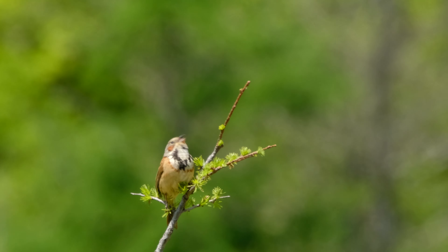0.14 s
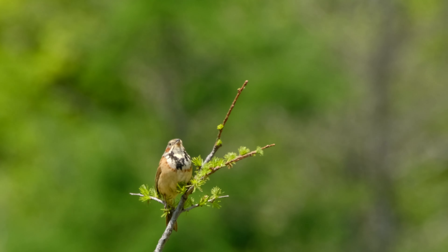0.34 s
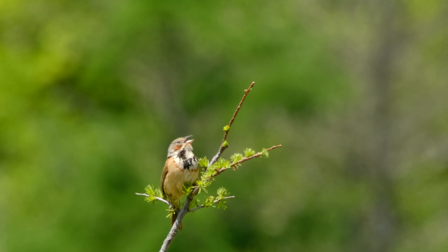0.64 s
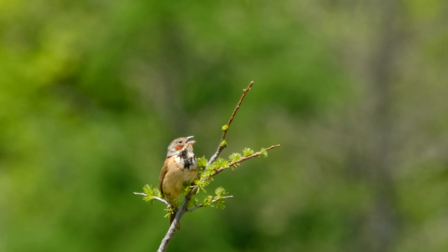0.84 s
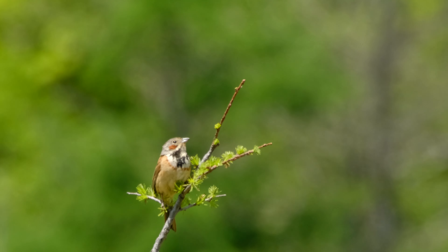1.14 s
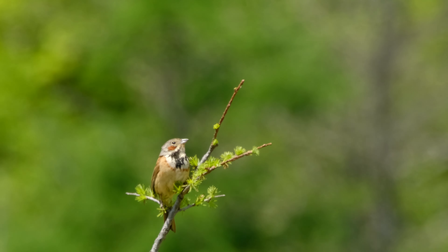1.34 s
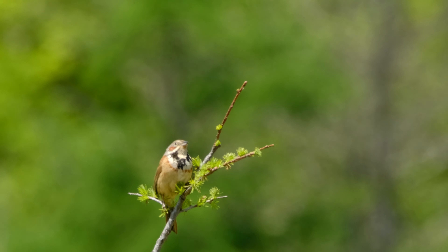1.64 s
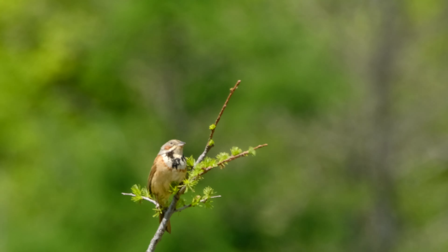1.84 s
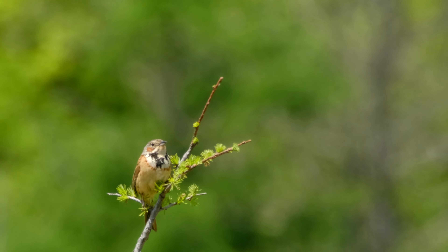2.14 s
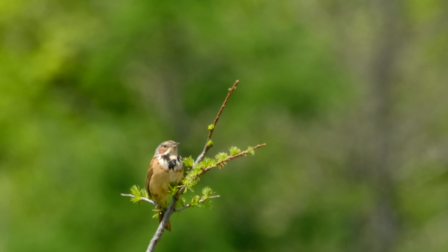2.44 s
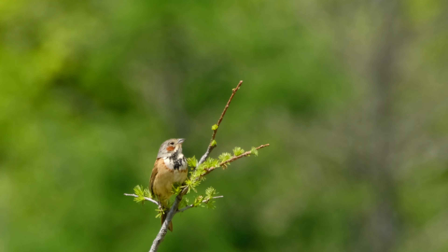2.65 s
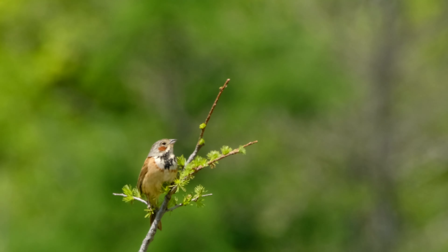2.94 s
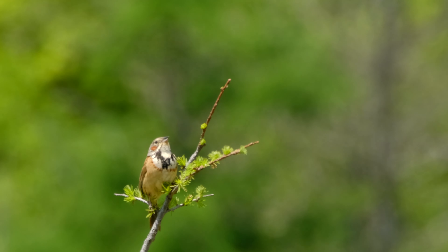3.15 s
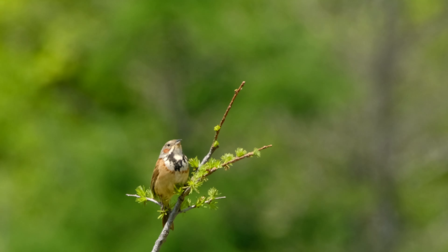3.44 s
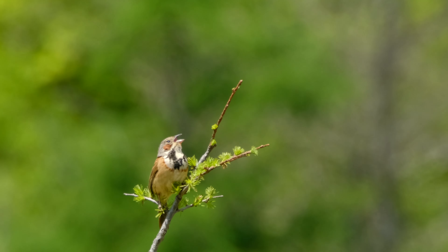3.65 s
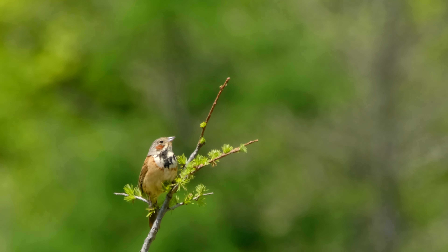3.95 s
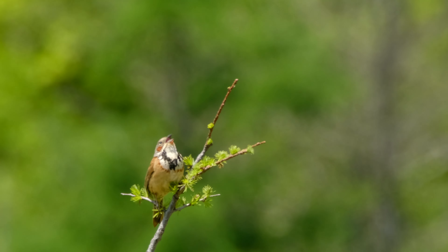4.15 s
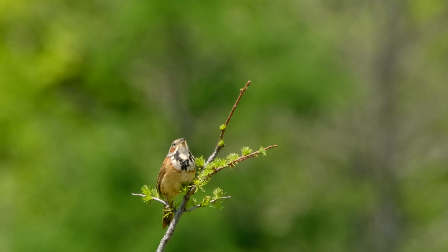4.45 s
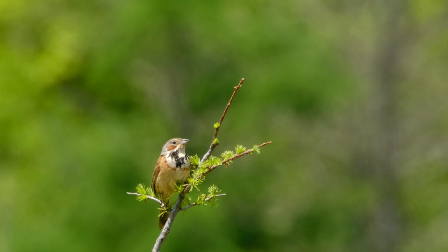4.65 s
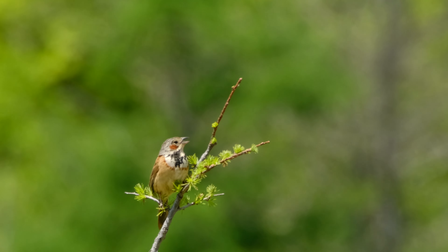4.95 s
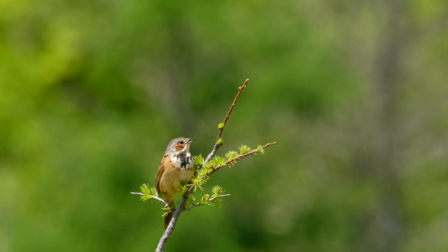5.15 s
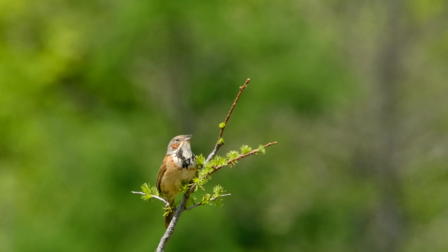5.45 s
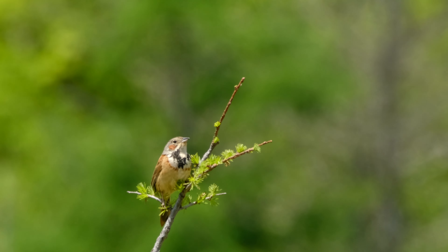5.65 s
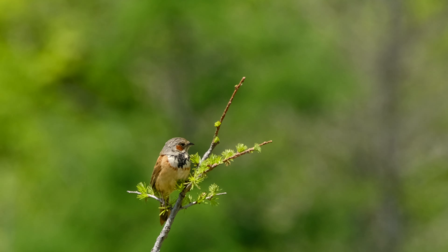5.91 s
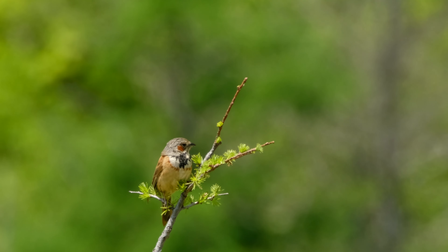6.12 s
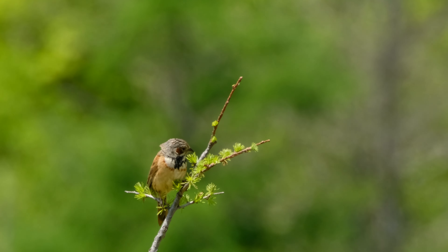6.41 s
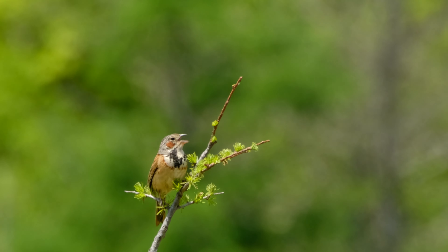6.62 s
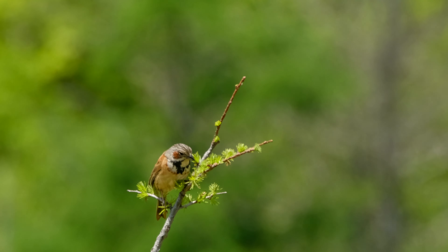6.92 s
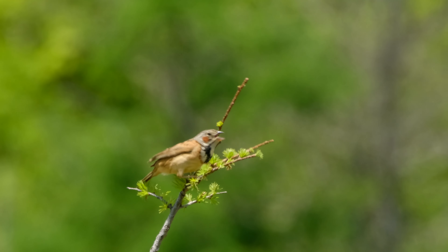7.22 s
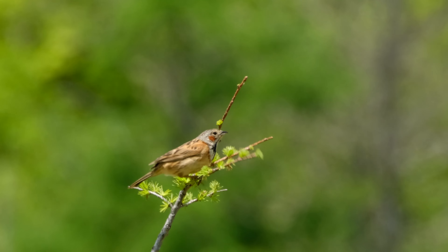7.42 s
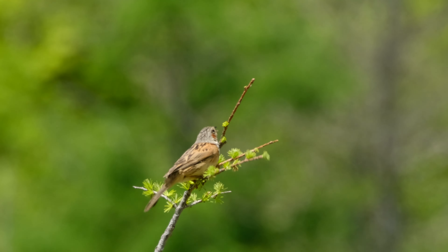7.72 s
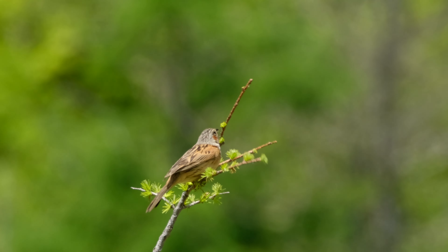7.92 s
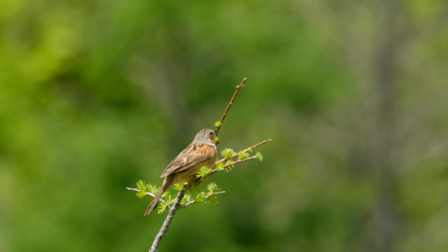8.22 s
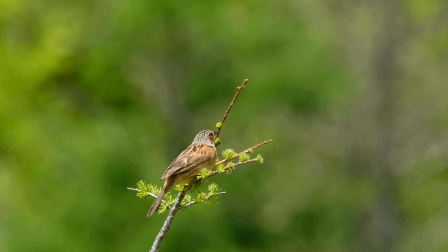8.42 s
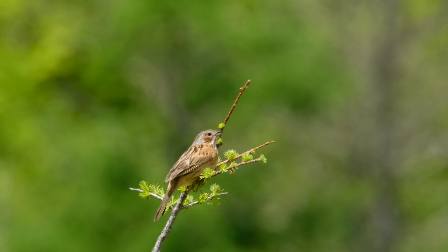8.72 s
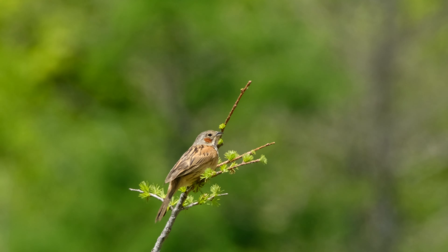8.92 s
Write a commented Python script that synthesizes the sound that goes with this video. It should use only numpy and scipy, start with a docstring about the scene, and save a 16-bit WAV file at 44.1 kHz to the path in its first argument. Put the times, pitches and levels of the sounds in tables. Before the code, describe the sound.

A small bird sings short, sharp, high twittering phrases over a steady insect buzz, with low wind rumble and faint distant bird whistles outdoors.

```python
"""In open country a bunting sings short, sharp phrases from a larch twig, with both sides of its syrinx as
gliding tones. A far chorus of cicadas buzzes steadily as resonant noise; other birds whistle faintly in the
distance, and soft slurs lead into the flourishes, all as gliding tones. Gusts rumble on the microphone as
shaped noise, over a soft wash of leaves and each channel's own hiss. The birds and the cicadas arrive almost
wholly in the right channel; the rumble is nearly alike in both."""
import sys
import numpy as np
from scipy import signal
from scipy.fft import rfft, irfft
from scipy.io import wavfile
from scipy.ndimage import uniform_filter1d

SR = 44100
rng = np.random.default_rng(int(sys.argv[2]) if len(sys.argv) > 2 else 0)


def master(y):
    """Save y as 16-bit WAV."""
    cut = np.clip(np.atleast_2d(y).T, -1, 1)
    pcm = np.round(cut * 32767)  # scale
    wavfile.write(sys.argv[1], SR, pcm.astype(np.int16))


N = 399987  # length in samples

# Noise spectra of leaves, channel hiss, wind rumble and small eddies, each later scaled to rms 1.
# Each row: frequency in Hz, relative spectral level in dB per Hz.
LEAF_SPECTRUM = [(100, -8), (400, 1.5), (650, 0.5), (800, 2), (950, -1.5), (3000, 3), (5000, -28),
                 (5800, -11.5), (7000, -38), (12000, -24)]
HISS_SPECTRUM = [(100, -47), (1000, 8), (4000, 1.5), (8000, 3.5), (16000, 2.5)]
RUMBLE_SPECTRUM = [(15, -13), (30, -8.5), (52, -2), (85, 0), (112, 0.5), (140, -7), (200, -17.5),
                   (300, -26), (600, -66), (3000, -100)]
EDDY_SPECTRUM = [(40, -28), (100, -1), (150, 2), (220, -3.5), (320, -13.5), (480, -21.5), (800, -54),
                 (4000, -100)]

# The steady breeze on the microphone, before a common lift. Each row: time in s, wind level in dB.
BREEZE_LEVELS = [(0.0, -40), (1.46, -55.5), (1.82, -48), (4.14, -47.5), (4.29, -40), (5.46, -41.5),
                 (6.14, -46), (6.49, -41), (7.27, -43.5), (8.03, -38), (8.71, -41.5), (9.07, -40)]

# Gusts on top of the breeze. Each row: time of the crest in s, wind level in dB,
# half length in s (to 1/e of the crest's power).
GUST_CRESTS = [(1.81, -48.5, 0.1), (2.031, -37, 0.012), (2.698, -42.5, 0.11), (3.566, -42.5, 0.076),
               (4.164, -37, 0.068), (4.518, -33, 0.045), (4.987, -35, 0.11), (5.381, -33, 0.021),
               (5.583, -34.5, 0.1), (5.994, -37, .035), (6.43, -37.5, 0.072), (7.98, -34, 0.13)]

# Resonances of the cicadas' bodies. Each row: frequency in Hz, width of each of two stages in Hz,
# rms level in dB before swell and throb, direct sound left minus right in dB.
CICADA_RESONANCES = [(1434, 390, -44, -19.5), (1713, 350, -50.5, -32), (2162, 214, -40, -25.5),
                     (2560, 300, -51.5, -28), (2851.5, 259, -32.5, -30), (3116, 226, -42.5, -31),
                     (4126, 630, -54.5, -26)]

# The lower-voiced group of cicadas. Each row: time in s, level in dB of its ringing of rms 1.
LOW_GROUP_LEVELS = [(0, -45), (1.3, -44.5), (2.2, -44), (3.5, -44.5), (5.0, -46), (6.2, -46.5), (6.85, -37),
                    (7.5, -48.5), (9.07, -45)]

# Faint whistles: other birds in the distance, and soft slurs just before the flourishes near 3.2 and 6.75 s.
# Each row: start in s, length in s, first pitch in Hz, last pitch in Hz, level in dB before the losses of the
# throat.
FAINT_WHISTLES = [ (1.15, 0.076, 3950, 3960, -50), (1.426, 0.16, 5050, 5080, -51),
                  (3.172, 0.048, 5750, 4600, -51), (5.87, 0.045, 5700, 6300, -54),
                  (5.96, 0.02, 3750, 3400, -42), (6.02, .14, 8350, 8600, -42),
                  (6.207, .06, 6400, 4020, -40.5), (6.245, .095, 4200, 3820, -46.5),
                  (6.6, .06, 6500, 5200, -53), (6.715, 0.04, 6500, 4800, -46),
                  (7.473, 0.13, 5770, 5250, -48.5), ]

# Turns of pitch of the bunting's notes, by gesture, before the syllable's pitch ratio.
# Each row: time from the note's start in ms, pitch in Hz.
PITCH_GESTURES = { "buzz_high": [(0, 4580), (18, 4280), (33, 3830)], "buzz_low": [(0, 4180), (22, 3800),
                  (37, 3350)], "hiccup": [(0, 3550), (5, 3300), (17, 3220)], "squiggle": [(0, 5000),
                  (4, 6300), (9, 5400), (15, 6500), (20, 6000)], "zigzag": [(0, 6700), (2, 6150), (5, 3950),
                  (10, 6100), (13, 3850), (20, 5500), (24, 3100)], "arch": [(0, 4400), (7, 4950),
                  (13, 5800), (18, 6050), (35, 5850), (39, 5400)], "slur": [(0, 3250), (15, 3450),
                  (26, 4380), (34, 4520), (44, 4480)], "cap": [(0, 5300), (5, 6600), (9, 6950), (15, 6650)],
                  "peak": [(0, 5200), (5, 4500), (11, 4400), (19, 5900), (22, 5700), (30, 3000)],
                  "hook": [(0, 3100), (7, 4650), (9, 4600), (15, 3200)], "trough": [(0, 7400), (6, 5950),
                  (10, 5600), (17, 5850), (24, 7050)], "slide": [(0, 7100), (9, 5550), (23, 4600)],
                  "blip": [(0, 3250), (7, 3650), (14, 3300)], "chip": [(0, 5400), (2, 4750), (8, 4100),
                  (12.5, 2900)], "dip": [(0, 5600), (4, 4700), (10, 4150), (14, 5300)],
                  "rattle": [(0, 3800), (8, 3250), (24, 3150)], "lift": [(0, 3100), (6.5, 4650),
                  (10, 3400)], "shelf": [(0, 4150), (4, 5000), (19, 4850), (22, 5700), (24.5, 7600),
                  (27, 5600), (29.5, 3600), (34, 6200)], "flick": [(0, 4300), (5, 6150), (7, 6800),
                  (9, 5700), (13, 2900)], }

# Gestures whose pitch shakes. Each row: rate in Hz, depth as a share of the pitch.
PITCH_FLUTTER = {"rattle": (235, .11), "hiccup": (170, .1)}

# Each syllable is a fixed group of notes; where two overlap, both sides of the syrinx sound.
# Each row: onset in ms, gesture, level in dB within the syllable, attack in ms, release in ms.
SYLLABLE_NOTES = { "warble": [(0, "buzz_high", -8, 22, 14), (0, "buzz_low", -7, 13, 10),
                  (49, "hiccup", -4, 5.3, 12), (54.4, "squiggle", -32, 3, 5.6), (75, "zigzag", -2, 3.5, 5)],
                  "duet": [(0, "arch", -6.5, 7.8, 3.1), (14, "slur", 0, 35.6, 13)],
                  "ripple": [(0, "cap", -11, 3.3, 3.7), (0, "peak", 4, 32, 14), (42, "hook", -10.5, 3.6, 6),
                  (52, "trough", -1.5, 5.4, 3), (67.6, "blip", -11.5, 3, 4.4),
                  (71, "slide", -6.5, 2.2, 10.6)], "tick": [(0, "chip", -1, 3, 2), (12, "dip", -14, 2.7, 3),
                  (26, "rattle", -3.5, 1.6, 20)], "flourish": [(0, "lift", -3.5, 2.9, 4.3),
                  (9.05, "shelf", -2, 2.5, 1.1), (44.5, "flick", -5.5, 1.3, 2.1)], }

# The bird goes round its five syllables in the same order.
# Each row: start in s, syllable, level in dB before the losses of the throat, pitch ratio.
SONG_SYLLABLES = [ (0.269, "warble", -16, 0.98), (0.738, "duet", -20.5, 1.004),
                  (0.906, "ripple", -25, 1.01), (2.662, "tick", -30, 1.03), (3.206, "flourish", -19, 1.007),
                  (3.710, "warble", -18, 1.0), (4.241, "duet", -21, 1.02), (4.388, "ripple", -18, 0.98),
                  (5.54, "tick", -19.5, .99), (6.753, "flourish", -19.5, 1.035),
                  (7.276, "warble", -21.5, 0.99), (7.802, "duet", -29, 1.05), (7.939, "ripple", -25.5, .99),
                  ]

WHISTLE_ATTACK_SHARE, WHISTLE_RELEASE_SHARE = 0.26, 0.35  # of a whistle's length
CUTOFF_HZ = 15850


def from_db(db):
    """An amplitude ratio is ten to the power of its decibels over twenty."""
    return 10 ** (np.asarray(db) / 20)


def rms_one(x):
    """Dividing a signal by its root mean square gives it unit rms."""
    return x / np.sqrt(np.mean(x ** 2) + 1e-20)


def noise(spectrum):
    """Weighting the spectrum of white noise gives steady coloured noise, here of rms 1."""
    hz, db = np.transpose(spectrum)
    bins = np.maximum(np.fft.rfftfreq(N, 1 / SR), 1)
    # levels run straight between the points on a logarithmic frequency axis
    gain = from_db(np.interp(np.log(bins), np.log(hz), db))
    white = rfft(rng.standard_normal(N))
    return rms_one(irfft(white * gain, N))


def drift(rate, size=N):
    """Straight lines between random values, `rate` a second, make a band-limited fluctuation about 0."""
    turns = np.arange(size) / SR * rate
    count = int(turns[-1]) + 2
    return np.interp(turns, np.arange(count), rng.standard_normal(count))


def resonate(x, hz, width_hz):
    """A damped resonator is a pair of conjugate poles; the gain at its peak is about 1."""
    radius = np.exp(-np.pi * width_hz / SR)
    zeros = np.array([1, 0, -1]) * (1 - radius ** 2) / 2
    poles = [1, -2 * radius * np.cos(2 * np.pi * hz / SR), radius ** 2]
    return signal.lfilter(zeros, poles, x)


def resonate_twice(x, hz, width_hz):
    """Two equal resonators in cascade steepen the skirts of the resonance."""
    return resonate(resonate(x, hz, width_hz), hz, width_hz)


def to_right(x, left_db, lead_ms):
    """Level and time differences between channels: the left gets a faint, slightly earlier copy."""
    n = np.arange(N)
    earlier = np.interp(n + lead_ms * SR / 1000, n, x)
    return np.array([from_db(left_db) * earlier, x])


def lowpass(x, hz):
    """A first-order low-pass run forwards and backwards leaves the phase untouched."""
    return signal.sosfiltfilt(signal.butter(1, hz, fs=SR, output="sos"), x)


def scatter(x, twigs_db, twigs_t60, trees_db, trees_t60):
    """Scattering as decaying noise: nearby twigs throw back a quick haze, the trees a faint long one."""
    t = np.arange(SR) / SR
    build_up = 1 - np.exp(-t / .004)
    response = 0
    for db, t60 in ((twigs_db, twigs_t60), (trees_db, trees_t60)):
        echoes = rng.standard_normal(SR) * build_up * from_db(-60 * t / t60)
        response = response + from_db(db) * echoes / np.linalg.norm(echoes)
    return signal.fftconvolve(x, response)[:N]


def swell(t, attack_s, release_s):
    """The envelope is a raised-cosine attack times a quarter-sine release."""
    rise = np.clip(t / max(attack_s, 1 / SR), 0, 1)
    fall = np.clip((t[-1] - t) / max(release_s, 1 / SR), 0, 1)
    return (1 - np.cos(np.pi * rise)) / 2 * np.sin(np.pi / 2 * fall)


def note(glide, envelope, jitter=0.0092, shimmer_db=2.65, throat_hz=4200, throat_db=6.0,
         top_hz=6200, top_db=42):
    """Phase is the integral of frequency: one side of the syrinx is a phasor that follows a glide."""
    glide = glide * (1 + jitter * drift(816, len(glide)))
    # dB lost per octave above the throat's resonance, and steeply at the top of the bird's range
    throat_loss_db = throat_db * np.log2(np.maximum(glide / throat_hz, 1))
    top_loss_db = top_db * np.log2(np.maximum(glide / top_hz, 1))
    shimmer = shimmer_db * drift(670, len(glide))
    strength = envelope * from_db(shimmer - throat_loss_db - top_loss_db)
    return strength * np.exp(2j * np.pi * np.cumsum(glide) / SR)


def sing(notes, second_db=-34, third_db=-36):
    """Superposition and distortion: overlapping voices beat, and weak harmonics add sum tones."""
    flow = np.zeros(N, complex)
    for s, tone in notes:
        start = int(s * SR)
        flow[start:start + len(tone)] += tone[:N - start]
    # the throat lets only a trace of the overtones out
    phase = np.angle(flow)
    second = from_db(second_db) * np.sin(2 * phase)
    third = from_db(third_db) * np.sin(3 * phase)
    return np.abs(flow) * (np.sin(phase) + second + third)


def air(foliage_db=-51, hiss_db=-59.5, shared_hz=560):
    """Broadband noise: a soft wash of far leaves, and an independent hiss in each channel."""
    leaves = from_db(foliage_db) * noise(LEAF_SPECTRUM)
    # the left channel's leaves weaken towards the treble
    left = lowpass(leaves, shared_hz)
    hiss = from_db(hiss_db) * np.array([noise(HISS_SPECTRUM), noise(HISS_SPECTRUM)])
    return np.array([left, leaves]) + hiss


def wind_level(breeze_db=1.5):
    """Powers add: bell-shaped gusts join the breeze in a wind level in dB."""
    t = np.arange(N) / SR
    power = from_db(np.interp(t, *np.transpose(BREEZE_LEVELS)) + breeze_db) ** 2
    for s, db, half_length in GUST_CRESTS:
        power = power + from_db(db) ** 2 * np.exp(-((t - s) / half_length) ** 2)
    return 10 * np.log10(power)


def wind(rumble_db=-2.0, rumble_growth=0.84, eddies_db=-6.0, eddy_growth=1.42, lumps_db=2.27,
         strong_db=-38, left_hz=450):
    """Turbulence makes a lumpy rumble, alike in both channels; stronger gusts shed brighter eddies."""
    excess_db = wind_level() - strong_db
    # growth is in dB of sound per dB of wind level
    low_db = strong_db + rumble_growth * excess_db + rumble_db + lumps_db * drift(22)
    high_db = strong_db + eddy_growth * excess_db + eddies_db + lumps_db * drift(30)
    low = noise(RUMBLE_SPECTRUM) * from_db(low_db)
    high = noise(EDDY_SPECTRUM) * from_db(high_db)
    # the left channel loses the finest eddies
    return low + np.array([lowpass(high, left_hz), high])


def cicadas(swell_db=0.43, throb_db=0.92, diffuse_db=-43):
    """Countless tymbal clicks merge into noise that rings in the bodies; groups swell and throb."""
    chorus = np.zeros((2, N))
    for hz, width_hz, db, left_db in CICADA_RESONANCES:
        ringing = resonate_twice(rng.standard_normal((2, N)), hz, width_hz)
        level_db = db + swell_db * drift(2.575) + throb_db * drift(40)
        direct, diffuse = rms_one(ringing) * from_db(level_db)
        chorus += to_right(direct, left_db, lead_ms=.3)
        chorus[0] += from_db(diffuse_db) * diffuse
    return chorus


def low_cicadas(hz=2040, width_hz=190):
    """Amplitude modulation of a lower resonance: one group comes and goes within the chorus."""
    ringing = rms_one(resonate_twice(rng.standard_normal(N), hz, width_hz))
    level = from_db(np.interp(np.arange(N) / SR, *np.transpose(LOW_GROUP_LEVELS)))
    return to_right(ringing * level, left_db=-25, lead_ms=.25)


def faint_notes(settling=2.2):
    """A power-law glide leaves its first pitch quickly and settles on its last, as (s, tone)."""
    for s, length, first_hz, last_hz, db in FAINT_WHISTLES:
        t = np.arange(int(length * SR)) / SR
        glide = last_hz + (first_hz - last_hz) * (1 - t / length) ** settling
        envelope = swell(t, WHISTLE_ATTACK_SHARE * length, WHISTLE_RELEASE_SHARE * length)
        yield s, note(glide, from_db(db) * envelope)


def faint_whistles():
    """Scattering smears faint sounds: faint whistles and slurs, smeared by the wood."""
    voice = sing(faint_notes())
    echoes = scatter(voice, twigs_db=-10, twigs_t60=.12, trees_db=-14, trees_t60=.6)
    return to_right(voice + echoes, left_db=-29, lead_ms=0.35)


def gesture(name):
    """Frequency modulation by muscle: time and pitch, with rounded turns and a shake on some notes."""
    ms, hz = np.transpose(PITCH_GESTURES[name])
    knots = ms / 1000
    t = np.arange(int(knots[-1] * SR)) / SR
    rounded = uniform_filter1d(np.interp(t, knots, hz), size=40)
    flutter_hz, depth = PITCH_FLUTTER.get(name, (0, 0))
    return t, rounded * (1 + depth * np.sin(2 * np.pi * flutter_hz * t))


def song_notes():
    """A pitch ratio scales every note of a syllable alike; each comes as (s, tone)."""
    for s, syllable, db, pitch in SONG_SYLLABLES:
        for onset_ms, name, note_db, attack_ms, release_ms in SYLLABLE_NOTES[syllable]:
            onset, attack, release = np.array([onset_ms, attack_ms, release_ms]) / 1000
            t, glide = gesture(name)
            envelope = from_db(db + note_db) * swell(t, attack, release)
            yield s + onset, note(glide * pitch, envelope)


def bunting():
    """Direct sound prevails close to a source: the near singer is almost dry."""
    voice = sing(song_notes())
    echoes = scatter(voice, twigs_db=-13, twigs_t60=.1, trees_db=-23, trees_t60=.7)
    return to_right(voice + echoes, left_db=-35, lead_ms=.4)


def scene():
    """Sound pressures superpose: leaves, wind and insects lie under the far birds and the song."""
    return air() + wind() + cicadas() + low_cicadas() + faint_whistles() + bunting()


def record(dry):
    """Band limiting: an elliptic low-pass cuts the top steeply."""
    lowpass_sos = signal.ellip(12, .1, 80, CUTOFF_HZ, fs=SR, output="sos")
    return signal.sosfilt(lowpass_sos, dry)


dry = scene()
out = record(dry)
master(out)
```